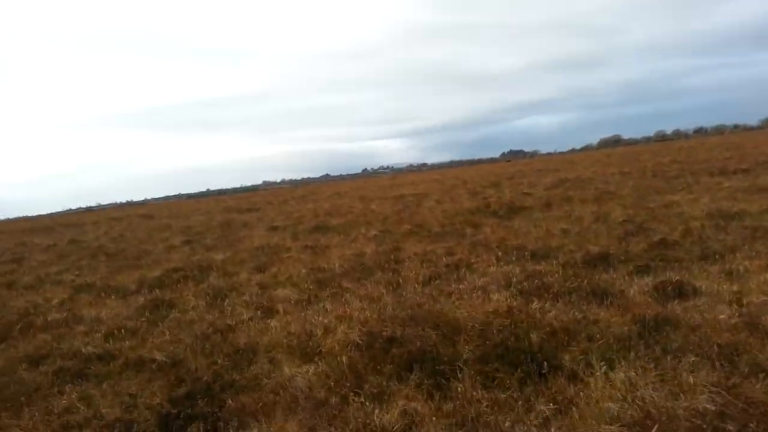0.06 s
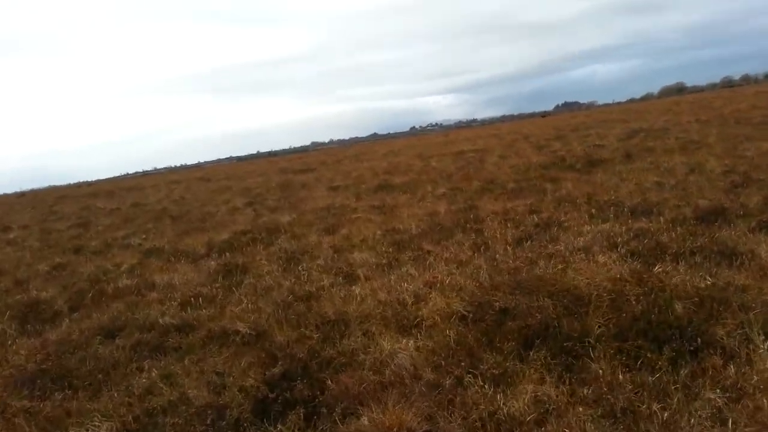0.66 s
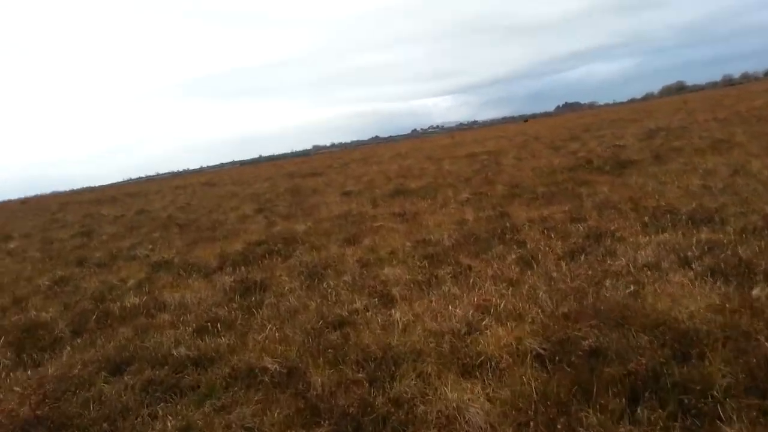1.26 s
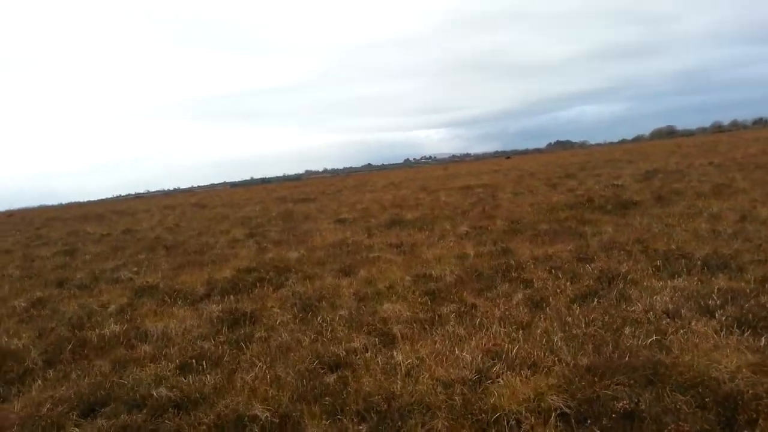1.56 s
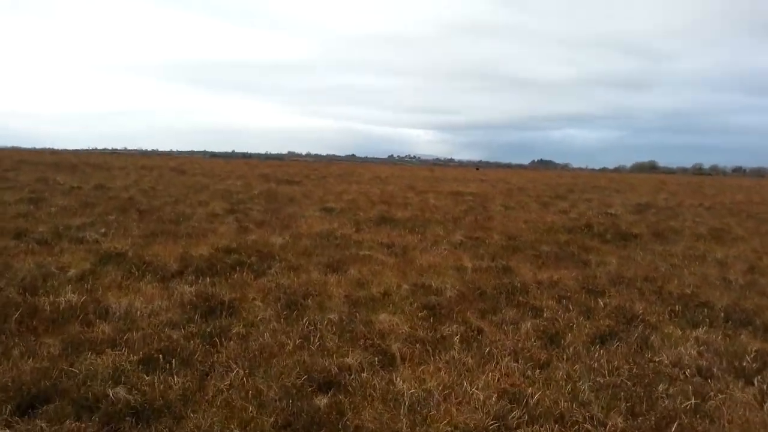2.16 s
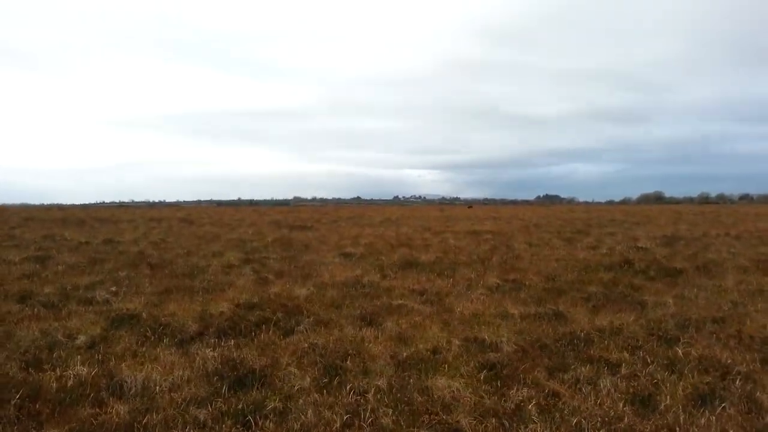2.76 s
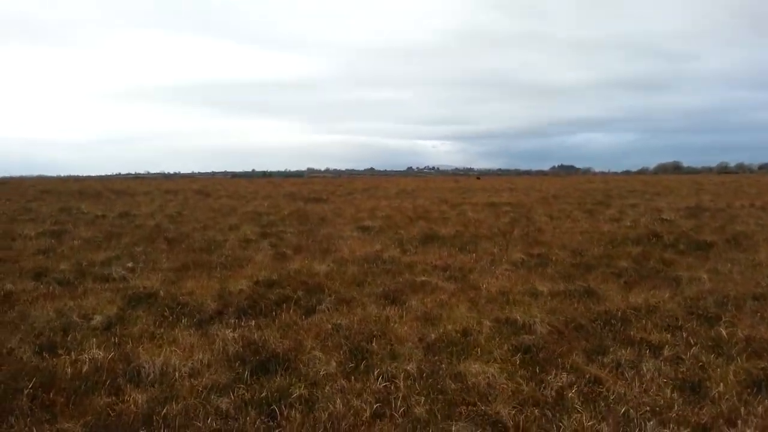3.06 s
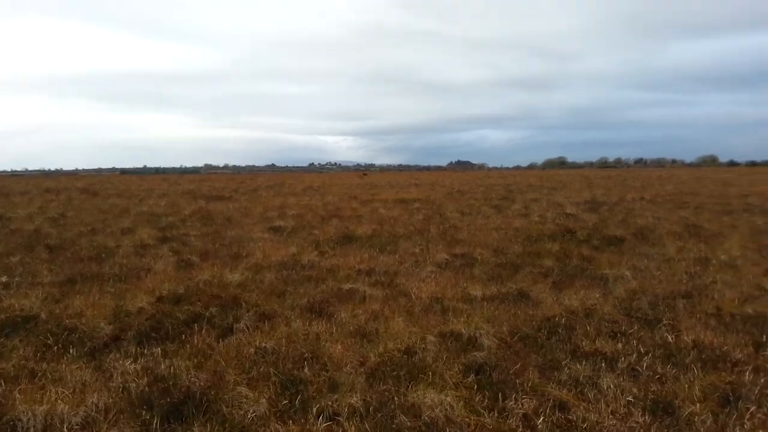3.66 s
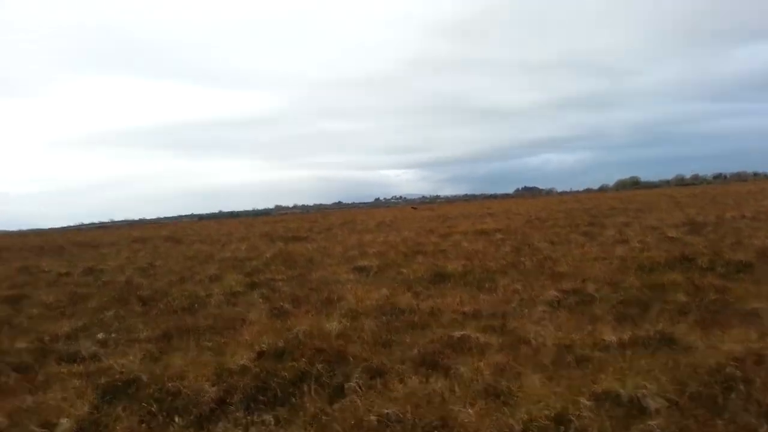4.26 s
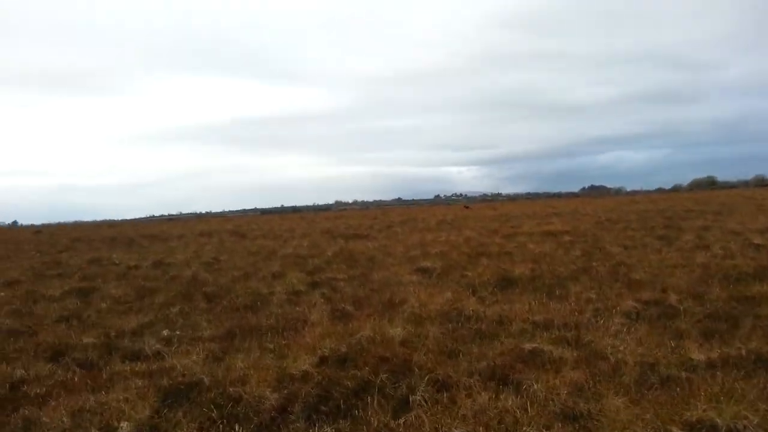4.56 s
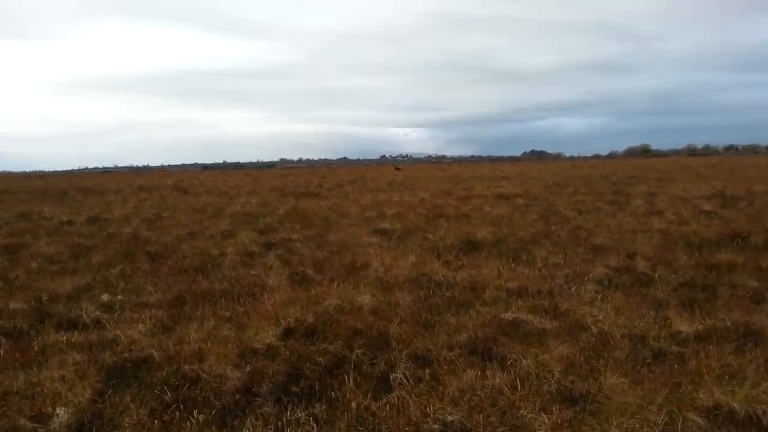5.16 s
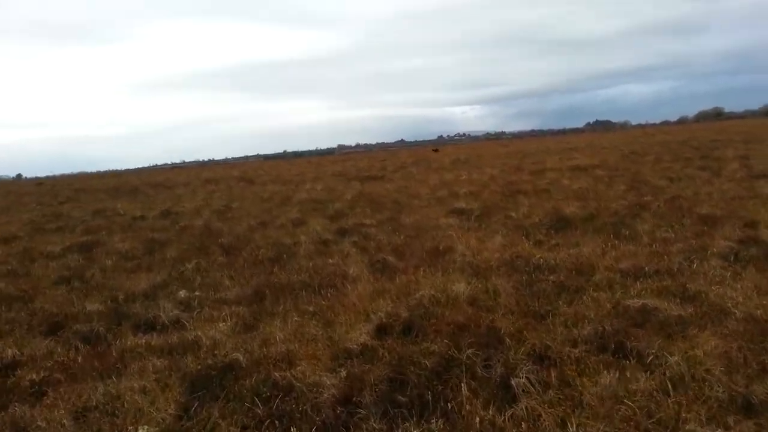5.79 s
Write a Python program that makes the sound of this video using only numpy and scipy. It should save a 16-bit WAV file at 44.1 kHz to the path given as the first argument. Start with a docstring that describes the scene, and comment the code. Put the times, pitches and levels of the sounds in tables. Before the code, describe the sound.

Footsteps swish and crunch through dry moorland grass, with sharp handling clicks and wind buffeting the microphone.

```python
"""Walking through moorland tussock

Dry grass on open moorland, heard from a small hand-held camera with two microphone ports.
Below it, each stride swishes the blades and crunches the stems. Right at the microphones the casing
creaks and clicks in the grip, and wind buffets the ports, mostly the left one, whose cavity rings."""
import sys
import numpy as np
from scipy import signal
from scipy.fft import rfft, irfft, next_fast_len
from scipy.io import wavfile
from scipy.ndimage import uniform_filter1d, map_coordinates

SR = 44100
rng = np.random.default_rng(int(sys.argv[2]) if len(sys.argv) > 2 else 0)


def dump(signal):
    """Clip the signal to [-1, 1] and save it as 16-bit WAV at the path in sys.argv[1]."""
    limited = np.clip(np.atleast_2d(signal).T, -1, 1)
    pcm = np.round(limited * 32767).astype(np.int16)
    wavfile.write(sys.argv[1], SR, pcm)


N = 257014


def undb(db):
    """Decibels to gain."""
    return 10 ** (np.asarray(db) / 20)


def wander(rate_hz):
    """Smooth random wandering with a spread near 1."""
    hold = max(int(SR / rate_hz), 1)
    steps = rng.standard_normal(4096)[np.arange(N) // hold % 4096]
    return 1.34 * uniform_filter1d(steps, hold)


def colour(x, spectrum, size=4096):
    """Minimum-phase filter that follows points of f/Hz, level/dB."""
    hz, db = np.transpose(spectrum)
    bins_hz = np.maximum(np.fft.rfftfreq(size, 1 / SR), 1)
    gain = undb(np.interp(np.log(bins_hz), np.log(hz), db))
    cepstrum = irfft(np.log(gain))
    cepstrum[1:size // 2] *= 2
    cepstrum[size // 2 + 1:] = 0
    response = irfft(np.exp(rfft(cepstrum)))
    return signal.fftconvolve(x, response[None], axes=1)[:, :x.shape[1]]


def stereo_pair(three, shared, alike_hz):
    """Left and right from one common and two separate signals; short waves differ more between ports."""
    size = three.shape[1]
    padded = next_fast_len(size)
    alike = shared / (1 + (np.fft.rfftfreq(padded, 1 / SR) / alike_hz) ** 4)
    waves = rfft(three, padded)
    return irfft(np.sqrt(alike) * waves[0] + np.sqrt(1 - alike) * waves[1:], padded)[:, :size]


# Wind strength at the camera, before each port's exposure: t/s, level/dB
WIND_STRENGTH = [(0.0, -27.5), (0.17, -32.5), (0.69, -23), (0.85, -32), (1.42, -26), (1.57, -40),
                 (1.67, -43), (1.79, -26.5), (2.4, -34.0), (2.79, -22.5), (3.06, -30), (3.47, -23.5),
                 (3.7, -33), (4.05, -26.5), (4.38, -30), (4.83, -24), (5.19, -31.5), (5.82, -24.5)]
# Spectrum of turbulence right on the ports: f/Hz, level/dB
EDDY_SPECTRUM = [(55, -35.5), (85, -15.5), (130, -4), (200, 1), (310, 1.5), (450, -6), (650, -16.5),
                 (1000, -35), (6000, -61)]
def wind(exposure_db=(-1, -17.5)):
    """Turbulence rumbles on each port in ragged lumps; the left faces the wind, the right is sheltered."""
    lumps = undb([7 * np.tanh(wander(85)) for _ in range(2)])
    rumble = colour(rng.standard_normal((2, N)) * lumps, EDDY_SPECTRUM)
    rumble /= np.sqrt(np.mean(rumble ** 2))
    strength_db = np.interp(np.arange(N) / SR, *np.transpose(WIND_STRENGTH))
    return rumble * undb(strength_db + np.array(exposure_db)[:, None])


# Peaks and dips of the microphone port cavities: f/Hz, width/Hz, left level/dB, right level/dB
PORT_CAVITIES = [(1442, 334, 12.5, 0), (2050, 380, -5, 3.5), (2713, 460, 8, 1.2), (11930, 2700, -1, -5.5)]
def ports(x, lag_samples=3.6):
    """Sound rings in each port's cavity and reaches the left microphone a little later."""
    for hz, width_hz, left_db, right_db in PORT_CAVITIES:
        cavity = signal.lfilter(*signal.iirpeak(hz, hz / width_hz, fs=SR), x)
        x = x + (undb([[left_db], [right_db]]) - 1) * cavity
    late_left = map_coordinates(x[0], [np.arange(x.shape[1]) - lag_samples])
    return np.array([late_left, x[1]])


def rustle(spectrum, per_s, spread_db, shared, flutter_db):
    """Tiny contacts, many weak and a few strong, reach both ports in uneven bunches."""
    hits = rng.random((3, N)) < per_s / SR
    strength = undb(spread_db * np.minimum(rng.exponential(size=(3, N)), 5))
    grains = hits * strength * rng.choice([-1, 1], (3, N))
    contacts = stereo_pair(grains, shared, alike_hz=2980) * undb(flutter_db * wander(60))
    sound = ports(colour(contacts, spectrum))
    return sound / np.sqrt(np.mean(sound.mean(axis=0) ** 2))


def swells(movements, fall_over_rise, shape=1.44):
    """Summed power of movements that each build and die away; shape 1 is pointed, 2 is rounded."""
    t = np.arange(N) / SR
    power = np.zeros(N)
    for peak_s, db, rise_s in movements:
        away = np.maximum(peak_s - t, (t - peak_s) / fall_over_rise) / rise_s
        near = away < 4
        power[near] += undb(db) ** 2 * np.exp(-away[near] ** shape)
    return power


# A leg sweeps through the blades below the camera, once a stride: fastest t/s, level/dB, rise/s
LEG_SWINGS = [(0.50, -40.5, 0.04), (1.21, -40.5, 0.05), (1.79, -38.5, 0.048), (2.47, -51, 0.26),
              (3.22, -45, 0.1), (3.95, -45, 0.17), (4.62, -47.5, 0.24), (5.42, -49, 0.091)]
# A boot presses or leaves a tussock: heaviest t/s, crunch level/dB, swish level/dB, rise/s
BOOT_TREADS = [(0.10, -37.5, -49, 0.097), (0.291, -30, -45, 0.023), (0.62, -37, -48, 0.028),
               (0.76, -36.5, -58, 0.042), (0.859, -37.5, -38.5, 0.021), (0.99, -40.5, -47, 0.098),
               (1.207, -31, -46, 0.024), (1.33, -35.5, -51, 0.17), (1.98, -37, -47, 0.077),
               (2.231, -36.5, -53, 0.031), (2.633, -31.5, -44, 0.021), (2.688, -38, -54, 0.018),
               (2.78, -36, -50, 0.17), (3.03, -45, -50.5, 0.096), (3.345, -35, -42.5, 0.053),
               (3.371, -26.5, -38.5, 0.015), (3.48, -39.5, -67, 0.15), (4.12, -36.5, -46, 0.045),
               (4.24, -39, -63, 0.07), (4.55, -36, -62, 0.045), (4.85, -40.5, -53, 0.05),
               (4.98, -37.5, -58, 0.063), (5.62, -37, -53, 0.06), (5.8, -40.5, -60, 0.1)]
# Spectra of hissing blades and crunching stems, heard from hand height: f/Hz, level/dB
BLADE_SPECTRUM = [(2000, -11.5), (4000, 4.5), (5200, 1), (6000, -1.5), (8200, 0), (10500, 1.8), (12200, 3),
                  (14500, -13)]
STEM_SPECTRUM = [(70, -8), (480, 5.5), (800, 6), (1400, 1), (2200, 0), (3200, -1), (4500, -4.5),
                 (6000, -11.5), (10000, -26)]
def grass(trail_blades_db=-53.5, trail_stems_db=-44):
    """Blades hiss on the legs and stems crunch under the boot; between steps the grass trails faintly."""
    treads = np.array(BOOT_TREADS)
    swing = swells(LEG_SWINGS, fall_over_rise=1.15)
    bent = swing * undb(2) ** 2  # the swinging leg bends stems too
    pressed = swells(treads[:, [0, 1, 3]], fall_over_rise=0.79)
    brushed = swells(treads[:, [0, 2, 3]], fall_over_rise=0.79)
    swish = np.sqrt(swing + brushed + undb(trail_blades_db) ** 2)
    crunch = np.sqrt(pressed + bent + undb(trail_stems_db) ** 2)
    blades = rustle(BLADE_SPECTRUM, per_s=5000, spread_db=2.0, shared=0.03, flutter_db=1.9)
    stems = rustle(STEM_SPECTRUM, per_s=2600, spread_db=3.2, shared=0.68, flutter_db=2.2)
    return blades * swish + stems * crunch


def rms_in_10ms(x):
    """The rms a short sound would have with all its energy inside 10 ms."""
    return np.sqrt(np.sum(x ** 2, axis=-1, keepdims=True) / (SR / 100))


# The casing gives in the grip, right at the microphones: t/s, knock level/dB, ring level/dB,
# tick level/dB, slip decay/ms and, where another spot gives way, knock and ring pitch ratios
CASING_CLICKS = [(0.032, -29.5, -29, -51, 1.5), (0.0464, -19, -24.5, -28.5, 1.9, 1.01, 0.9),
                 (0.111, -37, -35, -46, 2.2), (0.1546, -20.5, -24, -42, 1.1, 0.99, 1.09),
                 (0.195, -27, -29, -45.5, 1.6), (0.2145, -31, -37, -56, 1.4), (0.265, -38, -29, -47, 1.8),
                 (0.2785, -15.5, -22, -33.5, 1.4, 1.02, 0.95), (0.3082, -40, -29, -56, 1.2),
                 (0.3156, -17.5, -21.5, -33, 1.4), (0.323, -28, -34, -52, 3.3),
                 (0.618, -27.5, -25, -50, 3.5), (0.841, -33, -31.5, -52, 4.3),
                 (0.8584, -25, -27, -40, 1, 1.01, 1.11), (1.1744, -42, -22, -37, 2.2),
                 (1.201, -22, -21, -38, 2.5, 0.94, 1.06), (1.4177, -31, -33, -34.5, 0.8),
                 (1.43, -32, -35, -53, 1.9), (1.445, -39, -31.5, -38.5, 2.5),
                 (1.551, -24, -26.5, -34.5, 2.4), (1.5576, -20, -18, -31, 1.3),
                 (1.5648, -25, -26, -38, 1.8), (1.5725, -18.5, -21.5, -39, 0.7, 1.01, 0.87),
                 (1.5765, -20, -28, -33.5, 2.8), (1.63, -50, -37, -55, 1), (1.644, -40, -34, -58, 1.5),
                 (1.6775, -33.5, -41, -56, 1.1), (1.708, -31.5, -33.5, -52, 4.6),
                 (1.773, -24.5, -21.5, -39.5, 2), (1.7888, -53, -26, -36.5, 3.8),
                 (1.8029, -48, -31, -44, 1.7), (1.9076, -36, -25.5, -42, 4.2),
                 (2.192, -26, -28, -42, 1.1, 1.09, 1.01), (2.3539, -25, -28.5, -30, 1.6, 1.18, 0.94),
                 (2.752, -37, -29.5, -53, 3.1), (2.771, -32, -26, -44, 5.4), (2.7817, -34, -22, -35, 2),
                 (2.7973, -29, -24, -28.5, 1.4, 1.19, 0.93), (2.9598, -35, -26, -43, 4.1),
                 (2.9663, -21, -24, -37, 3.5, 1.13, 0.98), (3.0035, -32.5, -34.5, -52, 1.9),
                 (3.1837, -33, -24, -36.5, 0.6, 1.18, 0.94), (3.4385, -35, -30.5, -54, 4.7),
                 (3.7199, -36, -31, -42.5, 11), (4.2368, -34, -31.5, -54, 4),
                 (4.336, -18.5, -23.5, -40, 1.5), (4.4044, -27, -25, -46, 0.48),
                 (4.4078, -20, -21, -42, 2.8), (4.4225, -25, -25, -48, 4), (4.4315, -27, -29, -50, 2),
                 (4.4374, -24, -19, -39, 4), (4.4568, -13.5, -18.5, -37, 1, 0.97, 0.85),
                 (4.5125, -32, -25, -52, 1), (4.5235, -42, -31, -56, 3), (4.5512, -31.5, -33, -56, 3),
                 (4.6274, -42, -29.5, -47, 1.2), (4.6985, -45, -36, -58, 0.84),
                 (4.7596, -30.5, -23.5, -37.5, 1.7, 1.3, 1.11), (4.939, -42, -28, -49, 1.4),
                 (5.202, -50, -48, -44, 1.3), (5.234, -62, -46, -42.5, 1.8),
                 (5.8105, -45, -32.5, -54, 1.17)]
# Spectra of the shell's knock, its ring and the ticking slips: f/Hz, level/dB
KNOCK_SPECTRUM = [(100, -37), (550, -25), (980, -7.5), (1330, 2), (1680, -5), (2400, -16), (5000, -55)]
RING_SPECTRUM = [(800, -35), (1700, 1), (2300, 5.5), (2760, 14), (3350, 6.5), (4400, 6), (5400, -16),
                 (10000, -54.5)]
TICK_SPECTRUM = [(2500, -2.5), (5000, 13.5), (8000, 10.5), (11800, 12), (15000, -3)]
def casing(size=2048):
    """A hard break among tiny slips sets the shell knocking and ringing; the slips alone tick."""
    out = np.zeros((2, N + size))
    ms = np.arange(size) / SR * 1000
    hard_break = 11 * (np.arange(size) == SR // 2000)
    for at_s, knock_db, ring_db, tick_db, slip_ms, *spot in CASING_CLICKS:
        knock_pitch, ring_pitch = spot or (1, 1)
        burst = np.exp(-ms / slip_ms) + undb(-25) * np.exp(-ms / 7)  # quick slips, then a faint rattle
        slips = rng.standard_normal((3, size)) * undb(5.8 * rng.standard_normal(size)) * burst
        slips = stereo_pair(slips, shared=0.98, alike_hz=5530)
        push = slips + hard_break
        start = int(at_s * SR)
        for drive, spectrum, pitch, db in ((push, KNOCK_SPECTRUM, knock_pitch, knock_db),
                                           (push, RING_SPECTRUM, ring_pitch, ring_db),
                                           (slips, TICK_SPECTRUM, 1, tick_db)):
            pitch *= 1 + 0.017 * rng.standard_normal()  # no two clicks are quite alike
            part = ports(colour(drive, np.array(spectrum) * [pitch, 1]))
            out[:, start:start + size] += part * undb(db) / rms_in_10ms(part.mean(axis=0))
    return out[:, :N]


def crackle(linger_s=0.083):
    """Around the jolts that make the casing click, single stems snap faintly and the shell ticks."""
    clicks_s = np.array([click[0] for click in CASING_CLICKS])
    gap_s = np.abs(np.arange(N)[:, None] / SR - clicks_s).min(axis=1)
    snaps = rustle(STEM_SPECTRUM, per_s=45, spread_db=2, shared=0.9, flutter_db=1)
    ticks = rustle(RING_SPECTRUM, per_s=30, spread_db=1.5, shared=0.9, flutter_db=1)
    return (snaps * undb(-48.5) + ticks * undb(-47.5)) * np.exp(-gap_s / linger_s)


# Single eddies striking the microphone ports: t/s, left level/dB, right level/dB
EDDY_HITS = [(0.453, -18.5, -48), (0.609, -16.5, -48), (0.663, -16.5, -32), (0.942, -26, -41.5),
             (1.072, -19.5, -37), (1.116, -11.5, -28), (1.269, -24.5, -40), (1.412, -23, -51),
             (1.706, -31.5, -24), (1.93, -23.5, -26), (2.083, -19, -51), (2.426, -42, -23.5),
             (2.771, -16.5, -31), (2.788, -18, -30), (2.829, -13.5, -39), (3.087, -22, -40),
             (3.206, -24.5, -54), (3.9, -18.5, -30), (4.064, -22, -44), (4.453, -31.5, -17.5),
             (4.598, -23, -38), (4.759, -21, -45), (4.995, -20, -38), (5.194, -23.5, -51),
             (5.592, -21, -40), (5.705, -17.5, -49)]
def buffets(swell_ms=2.4, size=8192):
    """An eddy gives a port one push inside a puff of turbulence: a dull flap, brighter than the rumble."""
    out = np.zeros((2, N + size))
    brighter = np.array(EDDY_SPECTRUM) * [1.08, 1]
    age = np.arange(size) / SR * 1000 / swell_ms
    impulse = 5 * (np.arange(size) == SR // 400)
    for at_s, left_db, right_db in EDDY_HITS:
        push = impulse * rng.choice([-1, 1], (2, 1))
        puff = rng.standard_normal((2, size)) * age * np.exp(-age)
        flap = colour(push + puff, brighter)
        start = int(at_s * SR)
        out[:, start:start + size] += flap / rms_in_10ms(flap) * undb([[left_db], [right_db]])
    return out[:, :N]


def scene():
    """Grass underfoot, the casing in the hand, wind on the ports; the open moor gives no echo."""
    return grass() + casing() + crackle() + wind() + buffets()


def record(dry, top_hz=14800):
    """The camera clips at full scale and cuts the top treble steeply."""
    lowpass = signal.ellip(10, 0.2, 80, top_hz, fs=SR, output="sos")
    return signal.sosfilt(lowpass, np.clip(dry, -1, 1))


dry = scene()
out = record(dry)
dump(out)
```